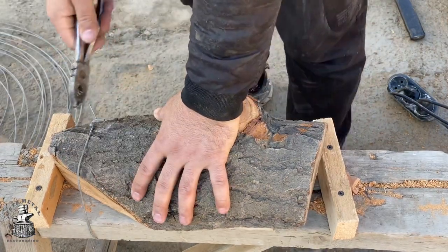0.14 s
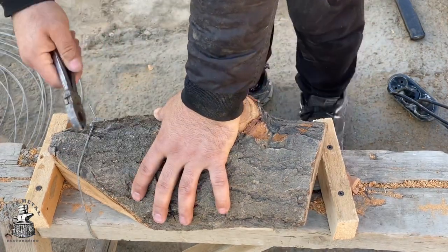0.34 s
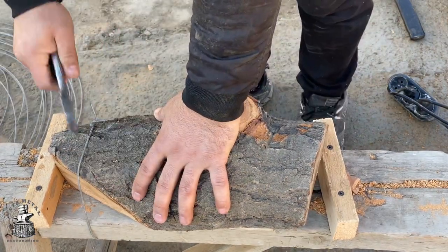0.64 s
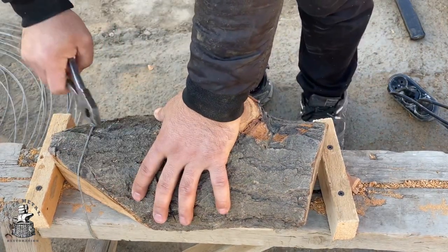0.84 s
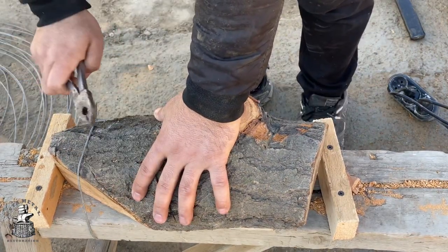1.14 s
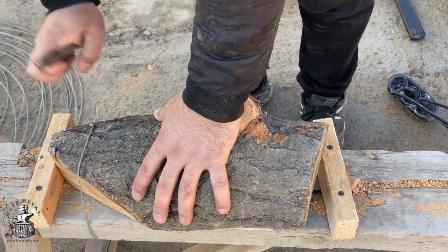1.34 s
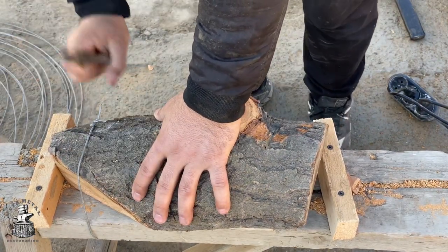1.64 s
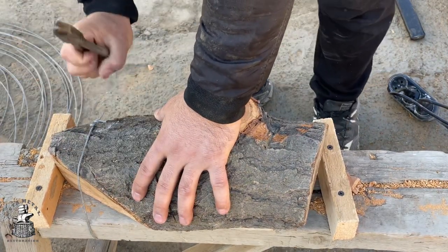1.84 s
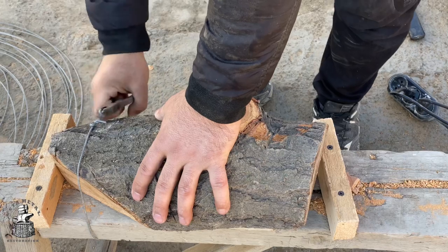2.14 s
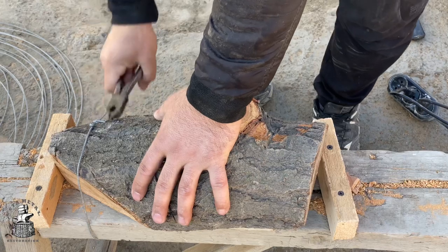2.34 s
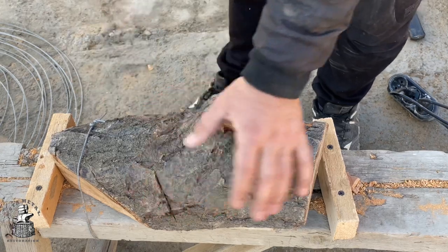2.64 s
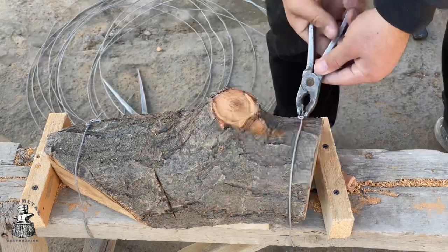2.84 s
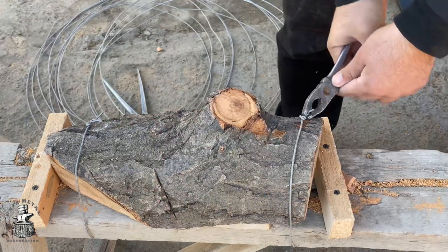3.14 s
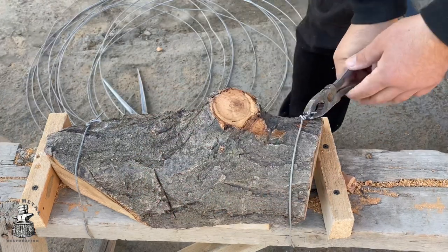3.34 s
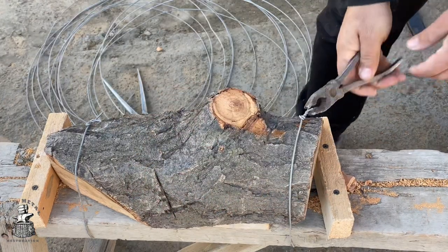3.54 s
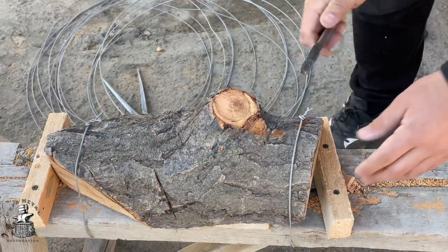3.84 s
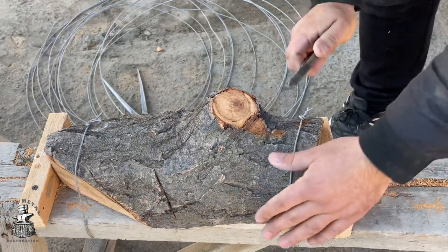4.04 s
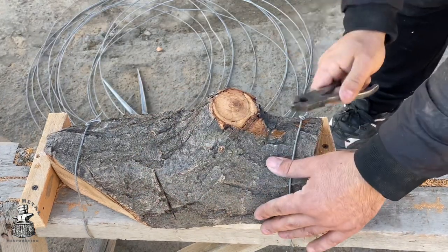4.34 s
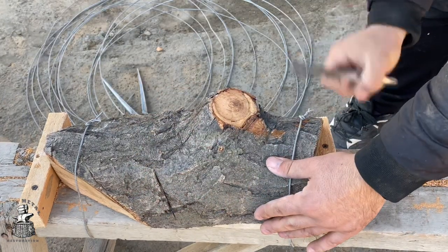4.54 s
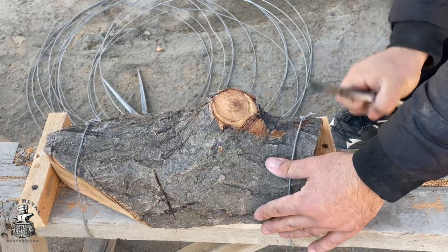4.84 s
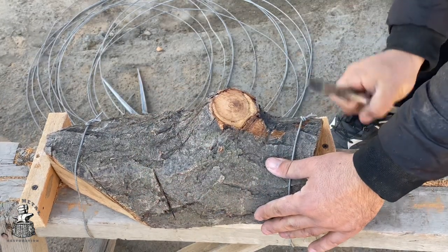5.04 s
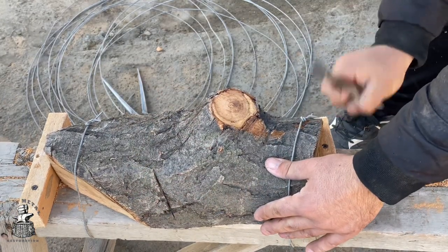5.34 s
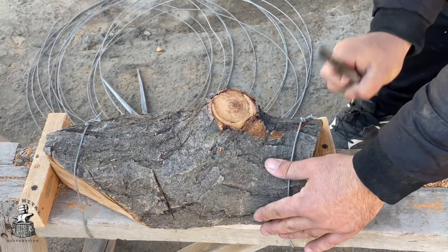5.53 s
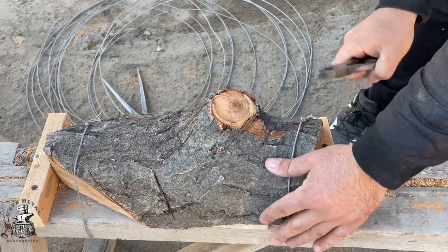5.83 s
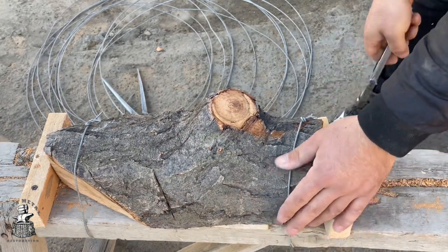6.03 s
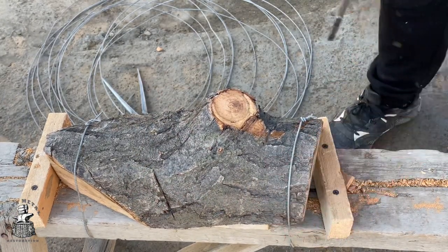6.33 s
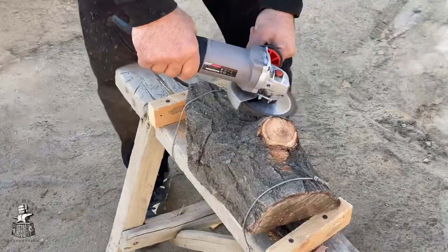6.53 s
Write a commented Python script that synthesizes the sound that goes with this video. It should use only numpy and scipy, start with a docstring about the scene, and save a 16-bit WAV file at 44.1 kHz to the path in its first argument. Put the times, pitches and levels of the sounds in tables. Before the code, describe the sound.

Sharp crunching taps of a steel tool on a log, dull bumps and cloth rubs between two runs, ending on a grinder's falling hiss.

```python
"""Outdoors, pliers hammer a wire twist flat against the bark of a log on a sawhorse, first at one end, then the other.
Each blow is a crunch of bark (shaped noise), a knock and thump of wood (fading sines and a noise burst) and a ring
of steel, board and wire (struck resonances). The tool ticks, sleeves rub and the trestle bumps; echoes follow.
Wind and yard murmur are shaped noise. At the end comes a cut to an angle grinder coasting down: hiss and sinking tones."""
import sys
import numpy as np
from scipy import signal
from scipy.fft import rfft, irfft
from scipy.io import wavfile
from scipy.ndimage import uniform_filter1d

SR = 44100
rng = np.random.default_rng(int(sys.argv[2]) if len(sys.argv) > 2 else 0)


def file_out(sig):
    """Save sig as 16-bit WAV at sys.argv[1]."""
    # one column per channel
    cols = np.atleast_2d(sig).T
    # limit, then scale
    lim = np.clip(cols, -1, 1)
    pcm = np.round(lim * 32767).astype(np.int16)
    wavfile.write(sys.argv[1], SR, pcm)


def to_linear_factor(level_db):
    """Convert decibel levels (scalar or array-like) to linear amplitude factors."""
    exponent = np.asarray(level_db, float) / 20
    return 10 ** exponent


N = 294588   # length in samples

# blows and bounces of the pliers: start_s [s], crunch_db [dB], thud_db [dB], knock_db [dB], contact_s [s]
BLOWS = [(0.1245, -27, -55, -44.5, 0.0074), (0.56, -12.5, -15.5, -29, 0.015),
         (0.5832, -26, -21, -31.5, 0.0043), (0.603, -34, -32.5, -25, 0.0062),
         (0.8345, -17.5, -21, -29, 0.012), (0.854, -41, -41.5, -37, 0.015),
         (1.111, -13.5, -27, -31, 0.0129), (1.13, -30, -27, -38.5, 0.0017),
         (1.403, -12, -17.5, -26, 0.0156), (1.4324, -29, -43, -28.5, 0.0043),
         (1.443, -41, -18.5, -29, 0.0037), (1.6858, -13.5, -10.5, -17, 0.013),
         (1.9275, -7.5, -9, -14.5, 0.0062), (1.954, -14, -20, -19.5, 0.006),
         (1.97, -23, -28, -31.5, 0.0039), (1.981, -31.5, -37.5, -32.5, 0.0084),
         (2.1248, -12, -13, -16.5, 0.008), (2.147, -24.5, -33.5, -32.5, 0.0025),
         (2.176, -27.5, -26.5, -49.5, 0.0047), (2.185, -16.5, -24, -47.5, 0.013),
         (2.2493, -29, -46, -38.5, 0.01), (2.262, -9.5, -14.5, -16, 0.004),
         (2.273, -27.5, -30.5, -20.5, 0.008), (2.296, -24.5, -24.5, -27.5, 0.006),
         (2.316, -22, -26, -26.5, 0.004), (4.3099, -14, -23.5, -33, 0.0069),
         (4.5726, -10, -20.5, -12, 0.0099), (4.779, -8.5, -17, -16, 0.0063),
         (4.801, -33.5, -26.5, -30.5, 0.0092), (4.9799, -12.5, -12.5, -9.5, 0.0086),
         (5.006, -12, -24, -44.5, 0.0022), (5.1734, -7.5, -13.5, -7, 0.0062),
         (5.1922, -28, -27.5, -30, 0.0087), (5.3722, -10, -11, -5, 0.0052), (5.393, -32.5, -23, -45, 0.015),
         (5.5699, -10.5, -16, -7, 0.0066), (5.58, -22, -31.5, -22.5, 0.0023),
         (5.594, -11.5, -23, -49.5, 0.0024)]
OTHER_END_S = 3.5   # blows after this time land on the other end of the log


def rms_one(x):
    """Scale to rms 1."""
    return x / np.sqrt(np.mean(x ** 2) + 1e-20)


def band(x, low_hz, high_hz):
    """Band-pass: keep only the pitches between two edges."""
    return signal.sosfilt(signal.butter(2, [low_hz, min(high_hz, .45 * SR)], "band", fs=SR, output="sos"), x)


def in_time(rows):
    """Turn rows of (time, values) into one smooth curve per value, sample by sample."""
    start_s, *columns = np.transpose(rows)
    return [np.interp(np.arange(N) / SR, start_s, column) for column in columns]


def at_hz(points, hz):
    """Read a curve over pitch, on a log axis."""
    point_hz, value = np.array(points).T
    return np.interp(np.log(hz + 1), np.log(point_hz + 1), value)


def drift(rate_hz):
    """Slow random wavering of rms 1, made at every 40th sample and joined by straight lines."""
    r = np.exp(-80 * np.pi * rate_hz / SR)
    noise = rng.standard_normal(N // 40 + 2002)
    slow = signal.lfilter([1], [1, -2 * r, r * r], noise)[2000:]   # skip the filter's start-up
    return np.interp(np.arange(N) / 40, np.arange(len(slow)), rms_one(slow))


def ring(force, hz, t60):
    """A resonance: a unit click sets a sine of height 1 ringing, 60 dB down after t60 seconds."""
    r, w = to_linear_factor(-60 / (t60 * SR)), 2 * np.pi * hz / SR
    return signal.lfilter([0, np.sin(w)], [1, -2 * r * np.cos(w), r * r], force + 1e-18)


def wide_noise(spectrum):
    """Stereo noise of rms 1 with a given spectrum, partly the same on the left and right."""
    # how alike left and right are: pitch_hz [Hz], likeness [0-1]
    likeness = [(60, .8), (300, .75), (1400, .75), (3000, .95), (7000, .92), (15000, .92)]
    hz = np.fft.rfftfreq(N, 1 / SR)
    mid, side = rfft(rng.standard_normal((2, N))) * to_linear_factor(at_hz(spectrum, hz))
    alike = np.clip(at_hz(likeness, hz), 0, 1)
    both = irfft(np.sqrt(1 + alike) * mid + np.sqrt(1 - alike) * side * [[1], [-1]], N)
    return rms_one(both)


def linger(blow_db, below_db, t60):
    """Power of a murmur that each blow starts and that dies away evenly."""
    kick, r = np.zeros(N), to_linear_factor(-120 / (t60 * SR))   # doubled dB because this is power
    start = np.round(np.array(BLOWS)[:, 0] * SR).astype(int)
    kick[start] = to_linear_factor(2 * (blow_db + below_db))
    return signal.lfilter([1], [1, -r], kick + 1e-18)


def open_air(lumpy_db=5.5, grain_db=1.0):
    """Lumpy wind on the microphone and a wavering yard noise with its own treble; all swell after a blow."""
    # levels over time, with a cut at 2.82 s: start_s [s], wind_db [dB], yard_db [dB], yard_treble_db [dB]
    air_levels = [(0.0, -65.5, -65.5, -68.5), (0.3, -62, -63.5, -70.5), (0.55, -68, -67, -74),
                  (1.1, -64, -73, -79.5), (1.9, -60.5, -69, -73.5), (2.45, -59, -66.5, -66.5),
                  (2.82, -64, -64, -66), (2.83, -62, -71.5, -88), (2.95, -64, -63.5, -79),
                  (3.11, -54.5, -62.5, -68.5), (3.5, -44, -61.5, -69.5), (3.8, -53, -60, -64.5),
                  (4.2, -62, -63, -67.5), (4.5, -48.5, -62, -72), (5.1, -55, -58.5, -76),
                  (5.55, -45, -55, -81.5), (5.8, -58, -59, -72), (6.1, -56.5, -59.5, -63.5),
                  (6.44, -51, -57, -63)]
    # spectrum of the wind: pitch_hz [Hz], level_db [dB per Hz]
    wind_spectrum = [(15, -43.5), (25, -7), (78, -1), (229, -12.5), (436, -30), (522, -25.5), (560, -47.5),
                     (700, -39), (910, -61), (1540, -120)]
    # spectrum of the yard: pitch_hz [Hz], level_db [dB per Hz]
    yard_spectrum = [(150, -30), (250, -5.5), (611, -7), (714, -9.5), (1460, -13), (1840, -11), (3500, -22),
                     (4550, -51), (7700, -120)]
    # spectrum of the yard's treble: pitch_hz [Hz], level_db [dB per Hz]
    treble_spectrum = [(2400, -31), (3200, 2), (6000, 1), (9000, -2), (11500, 1), (13000, -7.5),
                       (15500, -16), (17000, -30.5)]
    # murmur after each blow, in rows bass, middle, treble: level_db [dB relative to the blow], t60_s [s]
    murmur = [(-39.5, 1), (-41, 0.66), (-51, 0.97)]
    _, crunch_db, thud_db, *_ = np.transpose(BLOWS)
    sources = zip(in_time(air_levels), (thud_db, crunch_db, crunch_db), murmur)
    wind, yard, treble = [np.sqrt(to_linear_factor(2 * db) + linger(blow_db, *tail)) for db, blow_db, tail in sources]
    wind_noise = wind * to_linear_factor(lumpy_db * drift(21.0)) * wide_noise(wind_spectrum)
    yard_noise = yard * wide_noise(yard_spectrum) + treble * wide_noise(treble_spectrum)
    return wind_noise + to_linear_factor(grain_db * drift(54.0)) * yard_noise


def rubs(grain_db=1.2, swell_db=.7, flat=0.77):
    """Cloth and hands rub: grainy noise that swells and stops with each stroke."""
    # strokes: start_s [s], end_s [s], level_db [dB]
    strokes = [(.0, 0.044, -60.5), (0.232, 0.359, -46), (2.928, 3.077, -52.5), (3.184, 3.257, -64),
               (3.43, 3.468, -57.5), (3.477, 3.645, -55.5), (3.617, 3.77, -46.5), (3.89, 4.033, -50.5),
               (4.072, 4.108, -61), (5.953, 6.118, -53)]
    # spectrum of the rubbing: pitch_hz [Hz], level_db [dB per Hz]
    rub_spectrum = [(88, -35), (150, -1.5), (475, 5), (905, -0.5), (1290, 0), (2870, -2.5), (8560, -17),
                    (10600, -16), (14500, -27), (16000, -57.5)]
    t, loudness = np.arange(N) / SR, np.zeros(N)
    for start_s, end_s, level_db in strokes:
        part = np.clip((t - start_s) / (end_s - start_s), 0, 1)
        loudness += to_linear_factor(level_db) * np.sin(np.pi * part).clip(0) ** flat
    waver = to_linear_factor(grain_db * drift(67.0) + swell_db * drift(30.0))
    return loudness * waver * wide_noise(rub_spectrum)


def ticks(cycles=8.0, ring_share=.4, spit_share=.6):
    """Tool and wire tick: a short spit of noise around one pitch, part of it ringing for some cycles."""
    # small ticks: start_s [s], peak_db [dB], pitch_hz [Hz], length_s [s]
    tick_list = [(0.0704, -36.5, 2930, 0.00196), (1.3004, -43.5, 6320, 0.0033), (2.552, -41, 9580, 0.0014),
                 (2.813, -47.5, 1890, 0.0034), (3.021, -40, 1370, 0.0036), (3.207, -48, 2040, 0.0044),
                 (3.307, -48, 1530, 0.0036), (3.438, -47.5, 3530, 0.008), (3.4613, -32.5, 3290, 0.0034),
                 (3.4735, -38.5, 4000, 0.001), (3.6524, -21, 6950, 0.0038), (4.218, -55, 2200, 0.0022),
                 (5.717, -51.5, 1310, 0.0032), (5.743, -50.5, 2380, 0.00315), (5.929, -61.5, 1770, 0.003),
                 (6.1415, -60, 1510, 0.003)]
    out, t = np.zeros(N), np.arange(int(.04 * SR)) / SR
    noise = rng.standard_normal((len(tick_list), len(t)))
    for (start_s, peak_db, hz, length_s), spit in zip(tick_list, noise):
        spit = spit * np.exp(-t / max(length_s, .0004))
        ringing = rms_one(ring(spit, hz, cycles / hz))
        hiss = rms_one(band(band(spit, hz / 3.8, hz * 2.5), hz / 3, 11500.0))
        sound = ring_share * ringing + spit_share * hiss
        at = round(start_s * SR)
        out[at:at + len(t)] += to_linear_factor(peak_db) * sound / np.max(np.abs(sound))
    return out


def crunch(grain_db=5.0, first=0.4, fade_s=0.0016, crumble=0.089, crumble_s=0.022,
           steel_db=9.5, bark_db=3.0, lump_db=3.5):
    """The jaws crush bark: uneven cracks set in at once, swell during the contact, stop; crumbs settle after."""
    # resonances that colour the crunch: pitch_hz [Hz], width_hz [Hz], first_end_db [dB], second_end_db [dB]
    steel_modes = [(1428, 110, -1.5, -2.5), (1820, 380, -1.5, 2.5), (2550, 47, -7, -13.5),
                   (2700, 340, -0.5, -6), (4050, 440, 2, 4), (4090, 460, 3, 4.5), (5380, 400, -1, -6),
                   (5240, 1000, -2, -6.5), (6800, 94, -6, -8.5), (10350, 2680, 1, -1.5),
                   (14400, 1400, -6.5, -7)]
    low_hz, rolloff_hz, top_hz = 910, 3400, 9020
    t = np.arange(int(.2 * SR)) / SR
    shape = len(BLOWS), len(t)
    grain = np.minimum(rng.exponential(1, shape), 4)
    cracks = rng.standard_normal(shape) * to_linear_factor(grain_db * grain)
    lumps = rng.standard_normal((len(BLOWS), len(t) // 40 + 1))
    lumps = np.repeat(lumps, 40, axis=1)[:, :len(t)]   # cracks come in clumps
    cracks = cracks * to_linear_factor(lump_db * lumps)
    cracks = cracks / cracks[:, :400].std(axis=1, keepdims=True)
    strengths = to_linear_factor(1.8 * rng.standard_normal((len(BLOWS), len(steel_modes))))
    out = np.zeros((2, N))
    for (start_s, level_db, *_, contact_s), crack, strength in zip(BLOWS, cracks, strengths):
        swell = first + (1 - first) * np.clip(t / (0.6 * max(contact_s, .001)), 0, 1)
        since = np.maximum(t - contact_s, 0)
        fade = np.exp(-since / fade_s) + crumble * np.exp(-since / crumble_s)
        force = to_linear_factor(level_db) * crack * swell * fade
        steel = np.zeros(len(t))
        for k, ((hz, width_hz, *end_db), gain) in enumerate(zip(steel_modes, strength)):
            gain = gain * to_linear_factor(end_db[start_s > OTHER_END_S] + steel_db) * np.pi * width_hz / SR
            steel += gain * ring(force, hz, 2.45 / width_hz) * (-1) ** k
        at = round(start_s * SR)
        out[:, at:at + len(t)] += [to_linear_factor(bark_db) * force, steel]
    dull = np.exp(-2 * np.pi * rolloff_hz / SR)
    return band(signal.lfilter([1 - dull], [1, -dull], out), low_hz, top_hz)


def wood(late=0.5407, spread_db=1.2, wander=0.91, push_cycles=0.7):
    """The log takes the push late in each contact; strength and tuning of its damped modes vary per blow."""
    # lowest modes of log and sawhorse: pitch_hz [Hz], first_end_db [dB], second_end_db [dB], t60_s [s]
    thud_modes = [(105, -14.5, -2, 0.055), (162, -8.5, 2, 0.053), (184, -5.5, -1, 0.054),
                  (249.6, -1, -4.5, 0.052), (290, -1.5, -6, 0.031)]
    # middle modes: pitch_hz [Hz], first_end_db [dB], second_end_db [dB], t60_s [s]
    knock_modes = [(402, -7, -1, 0.033), (504, -4.5, 2, 0.029), (541.7, 1.5, -3, 0.042),
                   (637, 0, -3.5, 0.034)]
    # highest modes: pitch_hz [Hz], first_end_db [dB], second_end_db [dB], t60_s [s]
    plank_modes = [(810, -6.5, -7, 0.018), (895.7, 0.5, -4, 0.045), (952.5, -1.5, -6.5, 0.049),
                   (1080, -9.5, 3, 0.01)]
    # the highest modes' level lies between knock (0) and crunch (1), plus an offset at either end
    plank_sharp, plank_end_db = 0.3, (-5, -2)
    t, out = np.arange(int(.3 * SR)) / SR, np.zeros(N)
    groups = thud_modes, knock_modes, plank_modes
    modes = [(group, *mode) for group, rows in enumerate(groups) for mode in rows]
    chance = rng.standard_normal((len(BLOWS), len(modes), 3))
    for (start_s, crunch_db, thud_db, knock_db, contact_s), draws in zip(BLOWS, chance):
        end = start_s > OTHER_END_S
        plank_db = knock_db + plank_sharp * (crunch_db - knock_db) + plank_end_db[end]
        levels_db = thud_db, knock_db, plank_db
        at = round((start_s + late * contact_s) * SR)
        for (group, hz, *end_db, t60), (louder, higher, phase) in zip(modes, draws):
            build = np.clip(t * hz / push_cycles, 0, 1) ** 2   # low modes need longer to get going
            tone = np.sin(2 * np.pi * ((hz + wander * higher / t60) * t + phase))
            level_db = levels_db[group] + end_db[end] + spread_db * louder
            out[at:at + len(t)] += to_linear_factor(level_db - 60 * t / t60) * build * tone
    return band(out, 100.0, 4000.0)


def thump(rise_s=0.0045, fade_s=0.0095, share_db=-4.5):
    """Countless damped modes of the log blur into a short dense thump of noise under the knock."""
    t, out = np.arange(int(.08 * SR)) / SR, np.zeros(N)
    noise = rms_one(band(rng.standard_normal((len(BLOWS), len(t))), 210.0, 800.0))
    shape = np.clip(t / rise_s, 0, 1) * np.exp(-t / fade_s)
    for (start_s, _, _, knock_db, contact_s), burst in zip(BLOWS, noise):
        at = round((start_s + .5 * contact_s) * SR)
        out[at:at + len(t)] += to_linear_factor(knock_db + share_db) * burst * shape
    return out


def wire(waver_db=2.0):
    """The taut wire sings on: each mode rattles against the bark as a wavering line, renewed by every blow."""
    # modes, levels relative to the blow: pitch_hz [Hz], width_hz [Hz], first_end_db [dB], second_end_db [dB], t60_s [s]
    wire_modes = [(549, 35, -44.5, -58.5, .5), (950, 30, -46.5, -62.5, .6), (900, 110, -60, -48.5, .5),
                  (1360, 45, -51.5, -60, 0.62), (1915, 110, -46.5, -44, 0.54), (2350, 45, -56.5, -54, 0.54),
                  (2730, 60, -63, -54, .9)]
    start_s, crunch_db, *_ = np.transpose(BLOWS)
    out = np.zeros(N)
    for hz, width_hz, first_end_db, second_end_db, t60 in wire_modes:
        below_db = np.where(start_s > OTHER_END_S, second_end_db, first_end_db)
        loudness = np.sqrt(linger(crunch_db, below_db, t60)) * to_linear_factor(waver_db * drift(8.0))
        out += loudness * rms_one(ring(rng.standard_normal(N), hz, 2.2 / width_hz))
    return out


def pings(rise_s=.001, rough=0.56):
    """Jaws and wire ends ring briefly: one steel mode at a time, with an uneven loudness."""
    # brief rings: start_s [s], level_db [dB], pitch_hz [Hz], t60_s [s]
    ping_list = [(0.1269, -25.5, 2940, 0.034), (0.567, -17.5, 2980, 0.036), (.569, -17, 967, .04),
                 (0.603, -31.5, 2800, .03), (.839, -21, 1793, 0.045), (1.1137, -17.5, 2800, 0.041),
                 (1.114, -21, 1850, 0.038), (1.41, -23, 2650, 0.033), (1.692, -18.5, 1829, .035),
                 (1.931, -12.5, 2855, .025), (1.985, -29, 968, .06), (2.129, -17, 2850, .025),
                 (2.15, -19.5, 1846, .035), (2.263, -10, 2700, 0.027), (2.6095, -49, 2990, .03),
                 (2.612, -48, 1345, .035), (3.4722, -39, 2350, .015), (4.312, -22, 1739, 0.05),
                 (4.577, -14.5, 2655, .035), (4.783, -13.5, 2734, .03), (4.984, -14.5, 1850, 0.047),
                 (5.009, -19.5, 1940, 0.038), (5.596, -19, 1948, 0.036)]
    out, t = np.zeros(N), np.arange(int(.08 * SR)) / SR
    noise = rng.standard_normal((len(ping_list), len(t)))
    shakes = rms_one(uniform_filter1d(noise, size=60, axis=1))
    for (start_s, level_db, hz, t60), shake in zip(ping_list, shakes):
        loudness = to_linear_factor(level_db - 60 * t / t60) * np.clip(t / rise_s, 0, 1) * (1 + rough * shake)
        at = round(start_s * SR)
        out[at:at + len(t)] += loudness * np.sin(2 * np.pi * hz * t)
    return out


def board(spread_db=2.0):
    """A free end board rings longer than the held log; a hand or jaw left on it shortens the ring."""
    # taps on the board: start_s [s], level_db [dB], lowest_mode_extra_db [dB], freedom to ring [0-1]
    taps = [(.131, -40, 6.5, 1), (.569, -18.5, -14, 0.49), (.604, -26, 8.5, 0.49), (1.415, -28, 3.5, 0.91),
            (2.191, -21, -16.5, 0.7), (2.266, -16.5, -14, 0.45)]
    # modes of the free board: pitch_hz [Hz], level_db [dB], t60_s [s]
    board_modes = [(550, -11, 0.29), (883, 1, 0.049), (953, 1, 0.13), (2370, -15.5, 0.13),
                   (2940, -14.5, 0.079)]
    out, kick = np.zeros(N), np.arange(int(.4 * SR)) == 0   # kick: a single click
    chance = rng.standard_normal((len(taps), len(board_modes)))
    for (start_s, tap_db, low_db, free), louder in zip(taps, chance):
        at = round(start_s * SR)
        for k, (hz, mode_db, t60) in enumerate(board_modes):
            level_db = tap_db + mode_db + low_db * (k == 0) + spread_db * louder[k]
            out[at:at + len(kick)] += to_linear_factor(level_db) * ring(kick, hz, t60 * np.clip(free, .1, 1))
    return band(out, 400.0, 5000.0)


def sideways(x, lag_s=0.0022, share=0.32, scatter_db=-24.0, scatter_s=.003):
    """A near surface and close clutter throw the sound back with opposite sign at the two microphone ports."""
    x_mid, t = band(x, 490.0, 8500.0), np.arange(int(.02 * SR)) / SR
    clutter = rng.standard_normal(len(t)) * np.exp(-t / scatter_s)
    clutter = clutter / np.linalg.norm(clutter)
    late = share * np.interp(np.arange(N) - lag_s * SR, np.arange(N), x_mid)
    late = late + to_linear_factor(scatter_db) * signal.fftconvolve(x_mid, clutter)[:N]
    return x + late * [[1], [-1]]


def echoes(x, level_db=-19.0, smear_s=0.0018):
    """Scatter from ground and trestle fades at its own pace in each pitch band; far walls add smeared slaps."""
    # how long the scatter lasts: pitch_hz [Hz], t60_s [s]
    scatter_t60 = [(100, 0.47), (300, 0.44), (800, .3), (2000, 0.26), (5000, 0.26), (12000, 0.27)]
    # slap echoes of the walls: delay_s [s], level_db [dB]
    walls = [(0.051, -34.5), (0.066, -33), (.148, -44)]
    t, edges = np.arange(int(.4 * SR)) / SR, 70 * 2 ** np.arange(0, 8.1)   # octave edges in Hz
    noise = rng.standard_normal((3, len(t)))
    noise = noise[0] + 1.6 * noise[1:]   # partly shared, partly different in each ear
    tail = np.zeros((2, len(t)))
    for low, high in zip(edges, edges[1:]):
        octave = signal.butter(2, [low, high], "band", fs=SR, output="sos")
        tail += signal.sosfilt(octave, noise) * to_linear_factor(-60 * t / at_hz(scatter_t60, np.sqrt(low * high)))
    tail = tail * np.clip(t / 0.005, 0, 1)
    tail = to_linear_factor(level_db) * tail / np.sqrt(np.sum(tail ** 2) / 2)
    slaps = sum(to_linear_factor(db) * (t > s) * np.exp(-np.abs(t - s) / smear_s) for s, db in walls)
    slap_noise = band(noise, 360.0, 6200.0) * slaps / np.sqrt(smear_s * SR / 2)
    return signal.fftconvolve(x[None], tail + slap_noise, axes=1)[:, :N]


def bumps(fade_cycles=11.4, rise_s=0.01):
    """The log is tugged on its trestle: short dull swings, 60 dB down after fade_cycles, with a rough overtone."""
    # low bumps: start_s [s], level_db [dB], pitch_hz [Hz]
    bump_list = [(2.914, -37.5, 101), (3.071, -33, 69.4), (3.137, -36.5, 89.5), (3.18, -43.5, 88),
                 (3.228, -29.5, 76), (3.26, -49, 76), (3.307, -48, 53.3), (3.356, -26.5, 129),
                 (3.387, -40, 99.6), (3.418, -28, 81.4), (3.489, -41, 141), (3.526, -40, 71.5),
                 (3.593, -27, 105), (3.663, -29, 79), (3.695, -35, 53), (3.799, -29.5, 103.6),
                 (4.068, -37, 60.2), (4.137, -37, 92)]
    t, out = np.arange(int(.15 * SR)) / SR, np.zeros(N)
    chance = rng.random((len(bump_list), 2))
    for (start_s, level_db, hz), (phase, ratio) in zip(bump_list, chance):
        tone = np.sin(2 * np.pi * (hz * t + phase))
        tone = tone + 0.22 * np.sin(2 * np.pi * hz * (2.19 + 1.69 * ratio) * t)
        loudness = to_linear_factor(level_db - 60 * t * hz / fade_cycles) * np.clip(t / rise_s, 0, 1)
        at = round(start_s * SR)
        out[at:at + len(t)] += loudness * tone
    return out


def squeak():
    """The jaws slip on the wire: stick-slip noise in one resonance sets in at once and shrinks to nothing."""
    start_s, end_s, level_db, hz, width_hz = 3.453, 3.5, -52.5, 1780, 149.5
    left = (end_s - np.arange(N) / SR) / (end_s - start_s)   # 1 at the start, 0 at the end
    loudness = to_linear_factor(level_db) * np.clip(left, 0, 1) * (left < 1)
    return loudness * rms_one(ring(rng.standard_normal(N), hz, 2.2 / width_hz))


def grinder():
    """Fan hiss and a few gear tones sink together as the motor slows."""
    # the run-down: start_s [s], hiss_db [dB], whine_hz [Hz], whine_db [dB]
    run_down = [(6.445, -49, 1833, -97.5), (6.52, -48.5, 1730, -76.5), (6.54, -52.5, 1690, -64.5),
                (6.6, -54, 1560, -69.5), (6.68, -56, 1448, -76)]
    # spectrum of the fan hiss: pitch_hz [Hz], level_db [dB per Hz]
    fan_spectrum = [(250, -63), (500, -12.5), (1500, -18), (4000, -12.5), (5200, -6), (10000, -3),
                    (14500, 3.5), (15800, 7.5), (16300, -28.5)]
    # gear tones: multiple of the whine pitch, level_db [dB]
    gear_tones = [(0.999, -2.5), (2, -13), (3.65, -3)]
    hiss_db, whine_hz, whine_db = in_time(run_down)
    turn = 2 * np.pi * np.cumsum(whine_hz) / SR
    tones = sum(to_linear_factor(db + 2.5 * drift(30.0)) * np.sin(multiple * turn) for multiple, db in gear_tones)
    return to_linear_factor(hiss_db) * wide_noise(fan_spectrum) + to_linear_factor(whine_db) * tones


def ports(x):
    """Sound reaches the two microphone ports at different times: a phase shift split between left and right."""
    # phase between the ports: pitch_hz [Hz], left_lead [radians; negative where left lags]
    port_lead = [(20, 0), (500, .1), (780, .3), (1380, -.45), (3010, .45), (7300, -.3), (8000, -1.6),
                 (8550, -3.2), (9200, -5.4), (9730, -6.2), (10300, -6.4), (11700, -9.3), (12300, -9.4),
                 (13300, -11.9), (14400, -12.8), (15600, -15.6)]
    half = np.exp(.5j * at_hz(port_lead, np.fft.rfftfreq(N, 1 / SR)))
    return irfft(rfft(x) * [half, half.conj()], N)


def scene():
    """Hammering in the yard, then the cut to the grinder."""
    cut_s = 6.445
    bark, steel = crunch()
    steel = steel + pings()
    body = wood() + thump() + board() + ticks() + squeak() + wire()
    # the ring of the jaws is close and narrow: little of it reaches the walls
    knocks = sideways(bark + steel + body) + echoes(0.54 * bark + 0.12 * steel + body)
    yard = ports(knocks + bumps() + rubs() + open_air())
    after = np.clip((np.arange(N) / SR - cut_s) / .004, 0, 1)   # a 4 ms crossfade
    return yard * (1 - after) + grinder() * after


def low_pass(x):
    """Removes everything above the highest recorded frequency."""
    return signal.sosfilt(signal.butter(12, 16850, fs=SR, output="sos"), x)


def record(dry):
    """The lowest bass is cut, peaks are rounded."""
    x = signal.sosfilt(signal.butter(2, 40.0, "high", fs=SR, output="sos"), dry)
    mix = 1.086 * np.tanh(x / 0.98)
    return low_pass(mix)


dry = scene()
out = record(dry)
file_out(out)
```